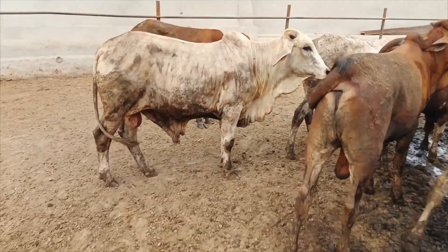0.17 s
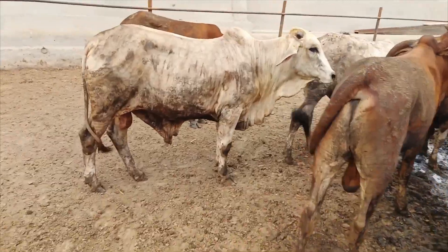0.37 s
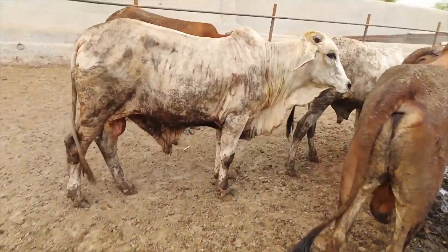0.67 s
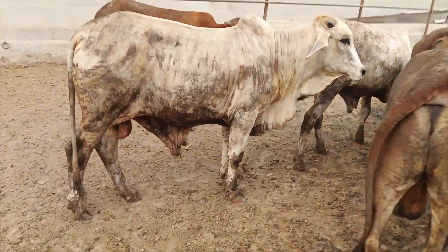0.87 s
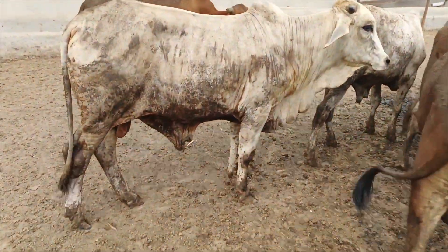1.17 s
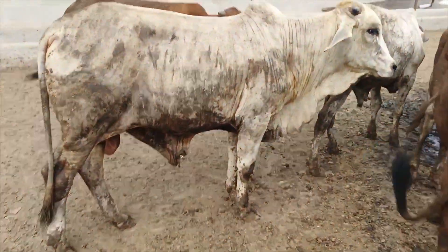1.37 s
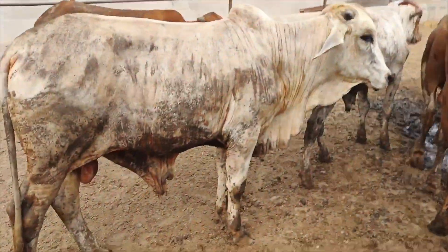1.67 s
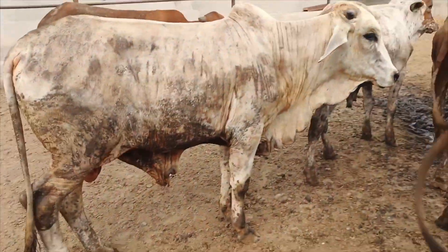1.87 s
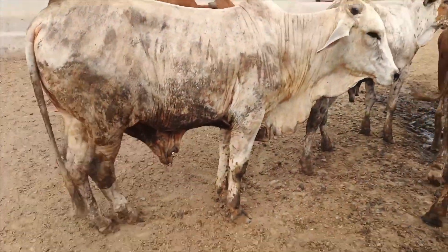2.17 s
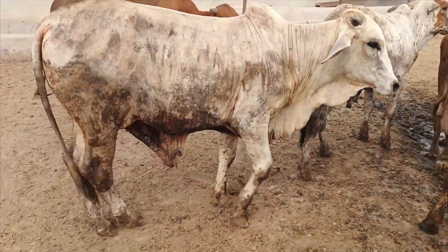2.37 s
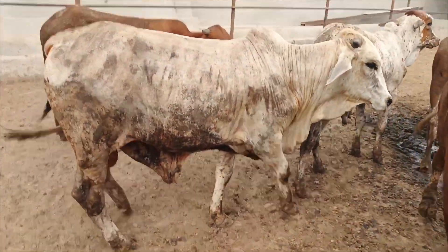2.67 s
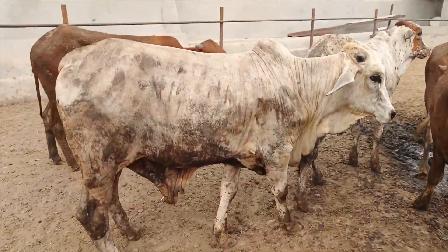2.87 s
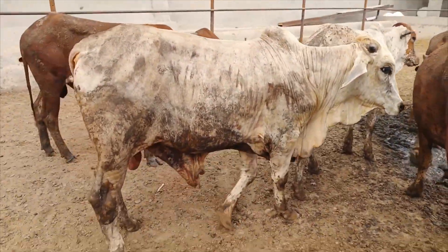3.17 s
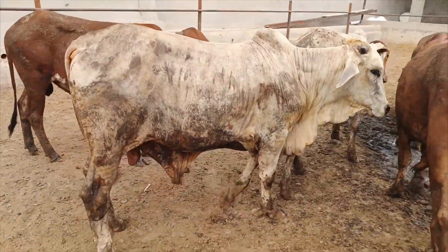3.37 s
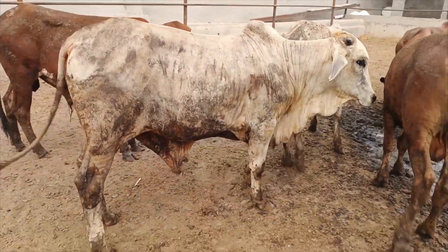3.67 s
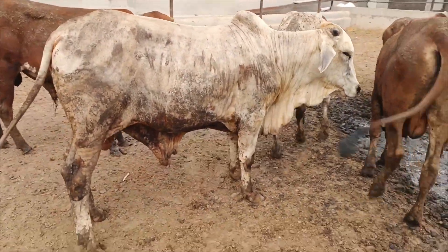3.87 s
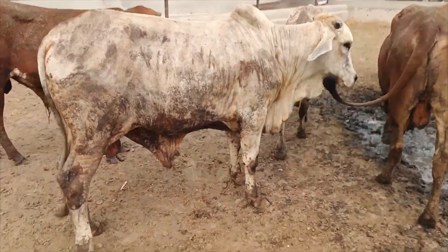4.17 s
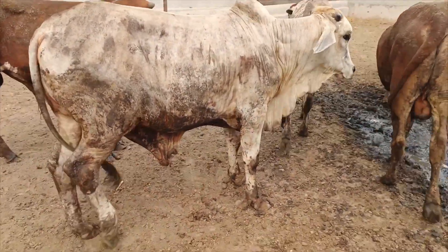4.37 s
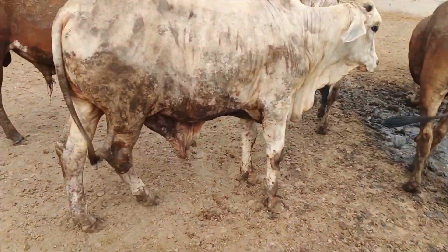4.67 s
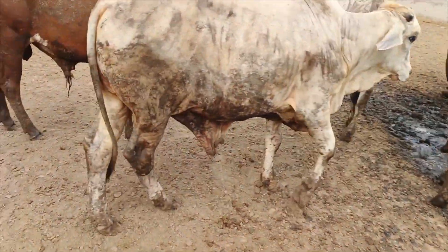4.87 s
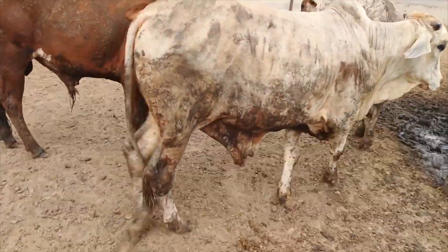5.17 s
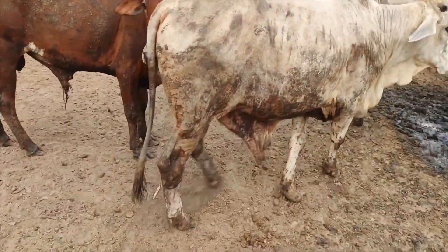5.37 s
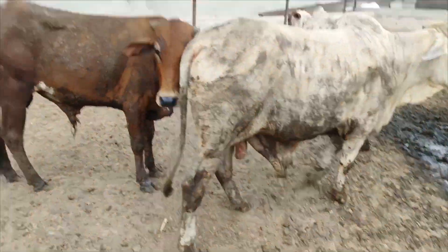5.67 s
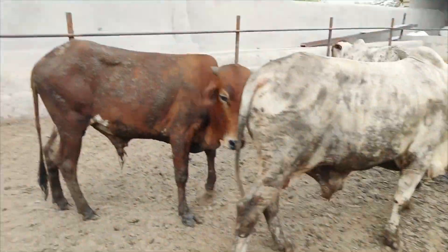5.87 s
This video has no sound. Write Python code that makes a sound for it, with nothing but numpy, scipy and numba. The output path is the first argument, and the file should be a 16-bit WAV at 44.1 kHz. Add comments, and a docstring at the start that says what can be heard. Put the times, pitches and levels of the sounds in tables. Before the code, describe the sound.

Close to the left, cattle step through a wet, muddy pen. Scattered bright splats come first, then a startlingly loud hollow plop and more splashes. After a lull, a flurry of bubbling plops runs into low ground rumble. Two barely audible whistles pass, a hoof slaps down hard, and dense squelching splatter follows. Quiet outdoor noise and a short yard echo surround it, as picked up by a phone.

```python
"""Cattle trample a wet pen to the left of a phone, over quiet outdoor noise and a yard echo all the way through.
First, thrown mud splats as showers of ringing drops; at 1.7 s air pockets plop as damped tones, one very loud.
Splats follow at 2.1 s; from 3 s a flurry of plops runs into low rumble, a wavering tone in broad noise.
At 4.3 and 4.5 s come two faint whistles, single fading tones. At 4.8 s a hoof slaps down, two blows ringing
the puddle. Plops and splats crowd to the end; dragged hooves add bubbles, spray and grit in swells."""
import sys
import numpy as np
from scipy import signal
from scipy.fft import rfft, irfft, next_fast_len
from scipy.io import wavfile
from scipy.ndimage import uniform_filter1d
from numba import njit

SR = 44100
rng = np.random.default_rng(int(sys.argv[2]) if len(sys.argv) > 2 else 0)


def waveform_to_disk(signal):
    """Save audio, clipped to [-1, 1], as 16-bit WAV at the path in sys.argv[1]."""
    frames = np.transpose(np.atleast_2d(signal))
    scaled = np.clip(frames, -1, 1) * 32767
    samples = np.round(scaled).astype(np.int16)
    wavfile.write(sys.argv[1], SR, samples)


N = 264776  # length in samples


def undb(db):
    """Turn decibels into a plain gain."""
    return 10 ** (np.asarray(db) / 20)


def level(x, db):
    """Scale a sound to an rms level in dB."""
    return x * undb(db) / np.sqrt(np.mean(x ** 2))


def colour(x, points, lag_s=0.):
    """Filter by (f/Hz, level/dB) points joined on a log frequency axis, with an optional delay."""
    size = next_fast_len(N + 4096)
    hz = np.arange(size // 2 + 1) * SR / size
    at, db = np.transpose(points)
    gain = undb(np.interp(np.log(hz + 1), np.log(at), db))
    delay = np.exp(-2j * np.pi * hz * lag_s)
    return irfft(rfft(x, size) * gain * delay, size)[:N]


def band(x, hz, width):
    """Two-pole resonance, gain 1 at the centre."""
    return signal.lfilter(*signal.iirpeak(min(hz, .45 * SR), hz / width, SR), x)


def walk(rate):
    """Random levels held 1 / rate s and smoothed twice; spread near 1."""
    k = int(SR / rate)
    steps = np.repeat(rng.standard_normal(N // k + 1), k)
    return 1.3 * uniform_filter1d(uniform_filter1d(steps, k), k)[:N]


@njit
def rings(count, s, hz, t60, size, glide, swell=1.):
    """Damped sines that swell over their first cycles; the pitch rises by the share glide while each dies away."""
    y = np.zeros(count)
    for e in range(len(s)):
        start, length = int(s[e] * SR), int(t60[e] * SR)
        fade, g, phase = np.exp(-np.log(1000) / (t60[e] * SR)), size[e], 0.
        for i in range(min(length, count - start)):
            phase += 2 * np.pi * hz[e] * (1 + glide * i / length) / SR
            y[start + i] += g * min(phase / (2 * np.pi * swell), 1.) * np.sin(phase)
            g *= fade
    return y


def bubbles(sizes, count, cycles, scatter_db, hiss_db):
    """Random bursts, each freeing one bubble of every size, over a flickering hiss in the same bands; rms 1."""
    out = 0
    when, force = rng.random((count, 2)).T
    for hz, width, db in sizes:
        late, pitch, loud = rng.random((count, 3)).T
        f = hz + width * (pitch - .5)
        # a few bursts are much stronger than the rest
        size = undb(np.minimum(-scatter_db * np.log(1 - force), 12) - 20.2 * loud)
        pops = rings(N, when * N / SR + .004 * late, f, cycles / f, size, 0.12)
        hiss = band(band(rng.standard_normal(N), hz, width), hz, width)
        hiss = hiss * undb(3.9 * walk(18))
        out = out + level(level(pops, 0) + level(hiss, hiss_db), db)
    return level(out, 0)


# tone balance of the outdoor noise: (f/Hz, relative level/dB)
YARD_COLOUR = [(20, -30), (40, -17), (100, -7.5), (200, -23), (420, -55), (520, -4), (620, 6), (820, 4),
               (950, -5), (1800, -9.5), (3300, -64), (5500, -9.5), (8000, -18), (12000, -31.5),
               (13800, -31), (15000, -19.5), (15550, -21), (15800, -43)]
# slow rise and fall of that noise: (t/s, change of all bands/dB, extra change of the top band/dB)
YARD_SWELL = [(0, 0.5, 4), (1.2, -2.5, 1), (1.4, 2, 7), (1.75, 1, -6), (2.2, 3, 6), (2.5, -1, 1),
              (2.8, -2.5, 11), (3.05, 1, -4), (3.6, -2.5, 9), (4.05, -2, -7), (4.4, -2, -2), (4.75, -7, 4),
              (5.3, -4, -17), (5.55, 4.5, -4), (6, -4, 1)]
YARD_DB = -53.5  # rms ahead of the ports


def yard():
    """Half-octave bands of distant noise that swell together and flicker alone; partly common to both ports."""
    t = np.arange(N) / SR
    s, all_db, top_db = np.transpose(YARD_SWELL)
    swell, top = np.interp(t, s, all_db), np.interp(t, s, top_db)
    out = 0
    for hz in 40 * 2 ** np.arange(0, 8.8, .5):
        edges = [(hz / 1.6, -40), (hz / 1.19, 0), (hz * 1.19, 0), (hz * 1.6, -40)]
        common, left, right = (colour(rng.standard_normal(N), edges) for _ in range(3))
        apart = min(hz / 5000 + 1.0, 1.2)  # higher bands differ more between the ports
        breathe = undb(swell + top * (hz > 12000) + 3.2 * walk(9))
        out = out + breathe * (common + apart * np.array([left, right]))
    return level(np.array([colour(c, YARD_COLOUR) for c in out]), YARD_DB)


def echo(x, t60, db, damp):
    """Walls and ground scatter the sound back, duller and differently to each port."""
    t = np.arange(int(.4 * SR)) / SR
    tails = rng.standard_normal((2, len(t))) * np.exp(-np.log(1000) * t / t60)
    tails = tails * (t > .003)  # silence before the first reflection
    tails = signal.lfilter([1], [1, -np.clip(damp, 0, .95)], tails)
    tails = tails / np.sqrt(np.sum(tails[0] ** 2))
    return undb(db) * signal.fftconvolve(x, tails, axes=1)[:, :N]


# faint thin whistles far off: (t/s, level/dB, f/Hz, time to fade by 60 dB/s)
WHISTLES = [(4.284, -56, 4400, 0.14), (4.536, -52.5, 5520, 0.12), ]


def whistles():
    """Each whistle is one steady pitch that starts at once and dies away."""
    s, db, hz, t60 = np.transpose(WHISTLES).copy()
    return rings(N, s, hz, t60, undb(db), 0.)


# strength of the ground rumble, before its flicker: (t/s, level/dB)
GROUND = [(0.0, -57), (0.43, -80.5), (0.8, -63), (1.4, -56), (1.54, -42.5), (1.7, -54), (1.9, -45),
          (1.97, -55), (2.27, -45), (2.45, -57), (2.61, -68), (3.22, -69.5), (3.3, -58), (3.5, -52),
          (3.57, -38), (3.65, -44.5), (3.74, -39), (3.791, -52), (3.86, -45.5), (3.908, -31.5),
          (3.944, -42), (3.991, -37), (4.11, -41.5), (4.17, -56.5), (4.43, -60.5), (4.72, -48), (4.79, -64),
          (4.85, -42), (5.0, -47), (5.6, -51.5), (5.8, -65), (5.9, -47), (6.0, -75)]
RUMBLE_HZ, RUMBLE_DRIFT = 108.5, .22  # centre tone; the share by which it drifts
RUMBLE_WAVER_HZ, RUMBLE_WIDE_DB = 70, -6  # how fast the tone wavers; the broad rumble around it


def rumble():
    """Hooves shake the ground: a wavering low tone in broad rumble; each port shakes a little on its own."""
    s, db = np.transpose(GROUND)
    pitch = RUMBLE_HZ * np.exp(RUMBLE_DRIFT * walk(6))
    phase = 2 * np.pi * np.cumsum(pitch) / SR
    tone = (1 + 0.82 * walk(RUMBLE_WAVER_HZ)) * np.cos(phase + 1.76 * walk(RUMBLE_WAVER_HZ / 2))
    broad = colour(rng.standard_normal(N), [(20, -23), (60, 10.0), (100, 14), (170, 7), (240, -3), (340, -56)])
    shake = np.array([level(band(rng.standard_normal(N), 65, 85), -17.0) for _ in range(2)])
    strength = undb(np.interp(np.arange(N) / SR, s, db) + 1.9 * walk(18))
    return (level(tone, -1.8) + level(broad, RUMBLE_WIDE_DB) + shake) * strength


# hooves dragged through the mud: (start t/s, swell/s, hold/s, sucking level/dB, spray level/dB)
DRAGS = [(0.689, 0.024, 0.02, -52.5, -55.5), (1.666, 0.027, 0.088, -35, -56),
         (2.958, 0.39, 0.094, -37, -46.5), (4.819, 0.032, 0.01, -31.5, -49.5),
         (4.942, 0.11, 0.55, -39.5, -51)]
SWELL_DB, RELEASE_DB_PER_S = 33, 59.5  # a drag rises out of quiet, then dies away


def drags():
    """Levels of sucking mud and spray as gains: each drag swells, holds and dies away."""
    start, swell, hold, mud_db, spray_db = np.transpose(DRAGS)[:, :, None]
    after = np.arange(N) / SR - start - swell  # time since the swell ended
    rise_db = SWELL_DB * after / swell
    release_db = -RELEASE_DB_PER_S * np.maximum(after - np.abs(hold), 0)
    shape_db = np.where(after < 0, rise_db, release_db)
    return (np.sqrt(np.sum(undb(db + shape_db) ** 2, axis=0)) for db in (mud_db, spray_db))


# sizes of air pocket in sucking mud: (f/Hz, width/Hz, relative level/dB)
MUD_SIZES = [(305, 190, -3), (560, 204, -1), (802, 160, -6.5), (1270, 1000, -11.5), (2200, 4400, -18.5)]
STIR_MUD_DB = -72  # the mud is never quite still


def sucking_mud(sucking):
    """Air pockets break up through the mud under a dragged hoof, as low bubbles."""
    mud = bubbles(MUD_SIZES, count=1300, cycles=10.0, scatter_db=3.5, hiss_db=-3.5)
    return mud * np.hypot(sucking, undb(STIR_MUD_DB))


# drop sizes in the spray: (f/Hz, width/Hz, relative level/dB)
SPRAY_SIZES = [(1620, 1167, -0.5), (2600, 880, -7), (3862, 1700, 1), (5660, 2150, 4), (9260, 3300, -10.5),
               (15000, 1400, -31)]
# strength of the fine patter between drags: (t/s, level/dB)
PATTER = [(0.0, -58), (0.8, -59.5), (1.25, -62.5), (1.47, -54.5), (1.6, -59.5), (2.2, -53), (2.6, -60.5),
          (3.0, -57.5), (3.75, -57), (3.9, -63), (4.25, -66.5), (4.42, -57), (4.62, -73.5), (4.8, -65.5),
          (5.75, -51.5), (6.0, -69.5)]


def spray(spraying):
    """Fine drops ring as they fall all around, so each port hears a share of its own."""
    patter_db = np.interp(np.arange(N) / SR, *np.transpose(PATTER))
    common, left, right = (bubbles(SPRAY_SIZES, count=1000, cycles=47.0, scatter_db=4.5, hiss_db=-3.0)
                           for _ in range(3))
    return (common + 0.96 * np.array([left, right])) * np.hypot(spraying, undb(patter_db))


# grains cracking under a dragged hoof: (f/Hz, width/Hz, relative level/dB)
GRIT_SIZES = [(1210, 1300, -14), (2600, 1000, 6), (4700, 1400, -7)]
GRIT_DB = -7  # against the drags' spray level


def grit(spraying):
    """Grains crack under a dragged hoof, as very short rings."""
    grains = bubbles(GRIT_SIZES, count=700, cycles=4.0, scatter_db=0.5, hiss_db=-17)
    return grains * spraying * undb(GRIT_DB)


# slurry falling back after the hardest steps: (t/s, gain on the wash/dB, fade to 37 %/s)
WASHES = [(1.74, -9, 0.056), (2.087, -13.5, 0.022), (2.254, -25, 0.062), (4.83, 0.5, 0.04)]
# tone bands of that wash: (f/Hz, width/Hz, level/dB)
WASH_BANDS = [(600, 710, -22), (1390, 700, -28), (3000, 2200, -39), (5800, 520, -39.5)]


def wash():
    """Slurry falls back after the hardest steps: flickering bands of noise that fade away."""
    t = np.arange(N) / SR
    fall = sum((t > s) * np.exp(-np.abs(t - s) / fade_s) * undb(db) for s, db, fade_s in WASHES)
    flicker = undb(2.5 * walk(120))
    noise = sum(level(band(band(rng.standard_normal(N), hz, width), hz, width), db)
                for hz, width, db in WASH_BANDS)
    return fall * flicker * noise


# the hard slap, toe then heel: (t/s, level/dB)
SLAP_BLOWS = [(4.8272, -11), (4.8313, -1)]
# tones each blow sets off: (f/Hz, level against the blow/dB, time to fade by 60 dB/s)
SLAP_RING = [(328, -4.5, 0.021), (560, 2.5, 0.018), (887, 1, 0.01), (2375, -9.5, 0.0095),
             (3250, -3.5, 0.0077), (5260, -17.5, 0.0096), (8400, -31, 0.0026)]


def slap():
    """Two blows, toe then heel, each ring the puddle at the same set of pitches."""
    rows = [(s, hz, t60, db + ring_db) for s, db in SLAP_BLOWS for hz, ring_db, t60 in SLAP_RING]
    s, hz, t60, db = np.array(rows).T.copy()
    return rings(N, s, hz, t60, undb(db), 0.)


# slurry thrown down: (t/s, main drop level/dB, main drop f/Hz, shower relative level/dB,
# time over which later drops weaken by 60 dB/s)
SPLATS = [(0.053, -30, 7040, -59, 0.021), (0.069, -40, 6100, -29.5, 0.012), (0.0766, -25, 1630, -42, 0.16),
          (0.2406, -17.5, 4370, -29.5, 0.044), (0.301, -44, 2560, -36, 0.21),
          (0.4246, -30.5, 2960, -43.5, 0.065), (0.4971, -33, 5050, -33, 0.048),
          (0.571, -26.5, 2850, -40.5, 0.11), (0.749, -17, 5430, -30, 0.16),
          (0.857, -36, 2290, -40.5, 0.072), (0.871, -30.5, 2260, -37.5, 0.14), (0.921, -33, 5500, -47, .03),
          (0.979, -29, 4200, -40.5, 0.034), (1.077, -41, 2200, -37.5, 0.059),
          (1.179, -24, 2100, -35.5, 0.08), (1.285, -25.5, 6600, -49, 0.1), (1.306, -36, 4840, -43.5, .05),
          (1.504, -19, 3660, -26.5, 0.12), (1.7152, -27, 2680, -42, 0.059), (1.7402, -22.5, 2650, -48, .06),
          (2.093, -15, 3850, -23.5, 0.2), (2.114, -29, 4900, -35.5, 0.066), (2.253, -18, 5500, -31, 0.11),
          (2.318, -21, 6170, -33.5, 0.04), (2.358, -25, 2720, -30, 0.13), (2.425, -37, 2600, -52, 0.03),
          (2.4796, -34, 2600, -43, 0.11), (2.5692, -27, 4800, -44, 0.096), (2.7172, -31, 5000, -36.5, 0.16),
          (3.014, -30, 5760, -47, 0.085), (3.081, -30.5, 3120, -60, 0.042),
          (3.104, -24.5, 2920, -61, 0.056), (3.171, -32.5, 3000, -59, .04),
          (3.222, -30.5, 5800, -40, 0.087), (3.241, -29, 2860, -44, 0.062), (3.2776, -26, 2600, -55, 0.043),
          (3.31, -32, 2820, -57, 0.044), (3.332, -27, 3000, -52.5, 0.049), (3.3654, -36.5, 2400, -42, .08),
          (3.382, -28, 3170, -50, 0.033), (3.396, -20.5, 2090, -35, 0.096), (3.407, -31, 3000, -50, 0.033),
          (3.424, -28.5, 2620, -55, 0.064), (3.464, -31, 4130, -49, 0.065),
          (3.477, -28.5, 2400, -46, 0.053), (3.5164, -27, 4770, -59, 0.045), (3.572, -32, 2820, -53, 0.058),
          (3.6, -31, 2860, -52, 0.052), (3.662, -27.5, 2940, -41, 0.063), (3.76, -40, 4700, -39, .1),
          (3.925, -35, 2600, -33.5, 0.15), (3.9476, -35.5, 2030, -36.5, 0.14),
          (4.151, -27.5, 1270, -69, 0.078), (4.3883, -37, 4600, -43, 0.13),
          (4.6705, -23.5, 4400, -46, 0.052), (5.0237, -29, 3340, -44, 0.032), (5.05, -34, 3050, -54, .06),
          (5.111, -26, 2600, -47, 0.049), (5.149, -22.5, 2850, -36.5, 0.08),
          (5.1817, -26, 2920, -54, 0.049), (5.244, -25, 2500, -45, 0.063), (5.27, -32, 2550, -51, .05),
          (5.292, -21, 2670, -54, 0.056), (5.323, -35, 2200, -46, .06), (5.331, -30, 2030, -38, .05),
          (5.354, -24.5, 2200, -52, 0.059), (5.373, -18, 3430, -39, 0.064), (5.4034, -27, 2600, -40, 0.057),
          (5.4277, -25, 2610, -39, 0.057), (5.4403, -25, 2490, -33, .05), (5.457, -14, 4370, -24.5, 0.047),
          (5.4866, -25, 4900, -37, 0.057), (5.514, -15.5, 2500, -31, 0.052),
          (5.5484, -25, 2650, -32.5, 0.08), (5.581, -12.5, 4830, -32.5, 0.025),
          (5.6317, -38, 2100, -35.5, 0.1), (5.6542, -19.5, 2890, -39, 0.048),
          (5.6737, -43, 2640, -40, 0.083), (5.681, -29, 2600, -53, 0.036),
          (5.7278, -28.5, 4160, -49, 0.093), (5.762, -32, 5100, -49, 0.062)]
BIG_DROPS_DB, SNAP_DB = -12, 5.5  # big drops against fine ones; the first drops, which land together
SNAP_SHARE = 0.05  # share of the fall in which the first drops land: brief splats snap, long ones swish
LEAD_SHARE = .35  # share of the first drops that land ahead of the main one
RISE_SHARE = .07  # share of the fall time over which the shower builds up
OVERTONE, OVERTONE_DB = 1.734, -9  # every third main drop rings higher
DROP_SWELL_CYCLES = 2.12


def splats(count=80):
    """Each splat is a fading shower: one drop in four near the main pitch, the rest of all sizes."""
    late, pitch, loud, place = rng.random((len(SPLATS) * count, 4)).T
    bearing = np.repeat(rng.random(len(SPLATS)) - .5, count)
    s, db, hz, fine_db, t60 = (np.repeat(c, count) for c in np.transpose(SPLATS))
    order = np.arange(len(s)) % count
    main, snap, high = order % 4 == 0, order < 24, order % 12 == 4
    # the first drops cover all sizes evenly
    pitch = np.where(snap & ~main, (order + pitch) / 24, pitch)
    snap_late = SNAP_SHARE * (late - LEAD_SHARE) * (order > 0)
    late = np.where(snap, snap_late, late ** 1.3 / 2 - RISE_SHARE)
    main_hz = hz * (1 + 0.28 * (order > 0) * (pitch - .5)) * np.where(high, OVERTONE, 1)
    f = np.where(main, main_hz, 1100 * 14 ** pitch)
    # big drops below 2 kHz, fine ones above 4 kHz, the finest ever weaker
    fine = np.clip(np.log2(f / 2000), 0, 1)
    finest = np.clip(np.log2(f / 6500), 0, 2)
    shower_db = fine_db + (1 - fine) * BIG_DROPS_DB - 11 * finest + 14.5 + snap * SNAP_DB
    db = np.where(main, db + high * OVERTONE_DB, shower_db)
    db = db - 60 * np.abs(late) - 8 * loud * (order > 0)
    cycles = np.where(main, 17, np.where(snap, 4.5, 13))
    # every splat lands at its own bearing, which shifts the delay between the ports
    lag_s = 7e-5 * bearing
    ports = []
    for side in (1, -1):  # left, right
        start = s + np.abs(t60) * late + side * lag_s
        size = undb(db + side * 0.47 * (place - 2.5))
        ports.append(rings(N, start, f, cycles / f, size, 0.16, DROP_SWELL_CYCLES))
    return np.array(ports)


# air pockets bursting in the mud: (t/s, level/dB, f/Hz)
PLOPS = [(0.496, -27, 710), (0.7195, -27.5, 490), (0.744, -34, 676), (0.855, -29, 796), (1.076, -38.5, 825),
         (1.504, -41.5, 675), (1.686, -18, 588), (1.694, -29, 534), (1.726, -19, 445), (1.7405, -2.5, 656),
         (1.75, -12.5, 587), (1.774, -20.5, 575), (1.797, -31, 600), (1.82, -26, 500), (1.862, -30, 600),
         (1.877, -20, 302), (1.878, -20, 650), (1.885, -21.5, 310), (1.903, -27, 298), (2.0895, -30, 620),
         (2.091, -31.5, 334), (2.257, -26, 323), (2.277, -30, 250), (2.293, -30, 280), (2.328, -31, 210),
         (2.357, -41.5, 600), (3.052, -36, 480), (3.079, -37, 494), (3.107, -29, 610), (3.134, -20.5, 484),
         (3.173, -27.5, 557), (3.211, -21, 747), (3.279, -16, 258), (3.335, -30, 710), (3.364, -23.5, 260),
         (3.366, -18.5, 654), (3.394, -21, 725), (3.422, -18, 586), (3.443, -23, 564), (3.457, -28, 570),
         (3.472, -18.5, 585), (3.499, -27, 577.8), (3.514, -20.5, 586), (3.553, -27.5, 265),
         (3.556, -26.5, 773), (3.6, -39, 872), (3.665, -25, 246), (3.667, -31.5, 796), (3.716, -24.5, 243),
         (3.757, -31, 448), (3.822, -35.5, 208), (3.95, -35, 573), (4.151, -30.5, 865), (4.421, -33.5, 654),
         (4.894, -25, 560), (4.92, -26, 480), (5.022, -12, 435), (5.051, -15.5, 477), (5.058, -17.5, 510),
         (5.077, -27, 600), (5.084, -20, 484), (5.109, -15, 532), (5.147, -19.5, 560), (5.179, -22, 533),
         (5.199, -34, 527), (5.219, -10, 508), (5.243, -21, 504), (5.269, -17.5, 509), (5.296, -34, 550),
         (5.322, -21.5, 524), (5.335, -31, 520), (5.372, -25, 507), (5.404, -33, 488), (5.427, -16.5, 342),
         (5.439, -17.5, 430), (5.461, -18, 313), (5.495, -31, 290), (5.514, -20, 317), (5.53, -23, 318),
         (5.547, -16.5, 525), (5.601, -23.5, 800), (5.63, -22, 560), (5.728, -32.5, 560),
         (5.77, -19.5, 559), (5.867, -34.5, 796)]
PLOP_T60_S, PLOP_HALVING_DB = 0.017, 32  # ring at 0 dB; it doubles for every so many dB softer
# pockets near this pitch ring longer, by up to this share again
LONG_RING_HZ, LONG_RING_OCTAVES, LONG_RING_GAIN = 570, 0.08, 0.8
PLOP_SWELL_CYCLES = 1.13


def plops(count=6):
    """Each pocket rings at its pitch, drags two softer neighbours after it and tears its film with a crackle."""
    s, db, hz = (np.repeat(c, count) for c in np.transpose(PLOPS))
    t60 = PLOP_T60_S * 2 ** (-db / PLOP_HALVING_DB)
    octaves_off = np.log2(hz / LONG_RING_HZ)
    t60 = t60 * (1 + LONG_RING_GAIN * np.exp(-(octaves_off / LONG_RING_OCTAVES) ** 2))
    late, detune = rng.random((len(s), 2)).T
    order = np.arange(len(s)) % count
    follower, film = order > 0, order > 2
    size = undb(db - 8.05 * follower - film * (-2.0 + 24.0 * detune))
    pocket_hz = hz * (1 + follower * 0.75 * (detune - .25))
    f = np.where(film, 900 * 4 ** detune, pocket_hz)
    ring_s = np.where(film, 14 / f, np.clip(t60, .005, .3))
    return rings(N, s + follower * 0.00489 * late, f, ring_s, size, 0.068, PLOP_SWELL_CYCLES)


# how the microphone capsule colours the hooves: (f/Hz, level/dB)
CAPSULE = [(20, -49), (60, -2), (150, 4.5), (7000, -1.5), (9000, -8.5), (13000, -9), (15000, 6.5),
           (16500, -3)]


def scene():
    """Hooves, whistles and their echo pass through the capsule's colour; rumble and yard noise join after it."""
    sucking, spraying = drags()
    dragged = sucking_mud(sucking) + spray(spraying) + grit(spraying)
    hooves = dragged + plops() + slap() + wash() + splats() + whistles()
    scattered = echo(hooves, t60=0.1, db=-10.5, damp=0.49)
    near = np.array([colour(c, CAPSULE) for c in hooves + scattered])
    return near + rumble() + yard()


# left minus right microphone: (f/Hz, level/dB)
PORTS = [(60, -0.5), (110, -1.0), (200, -1.5), (380, 1.5), (700, 2.5), (1290, 0.5), (2380, 0.0),
         (4400, -2.5), (8120, 2.5), (15000, 6.0)]
PORT_LAG_S = 18 / 44100
TOP_HZ = 16400  # nearly nothing is kept above this


def record(dry):
    """The herd is off to the left, so the right port hears it later; the ports differ in colour; peaks clip."""
    left = colour(dry[0], [(hz, db / 2) for hz, db in PORTS])
    right = colour(dry[1], [(hz, -db / 2) for hz, db in PORTS], PORT_LAG_S)
    both = np.clip([left, right], -.93, .93)
    return signal.sosfilt(signal.ellip(10, .2, 60, TOP_HZ, fs=SR, output="sos"), both)


dry = scene()
out = record(dry)
waveform_to_disk(out)
```